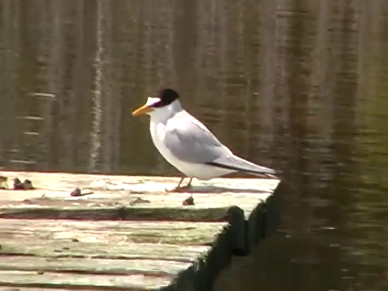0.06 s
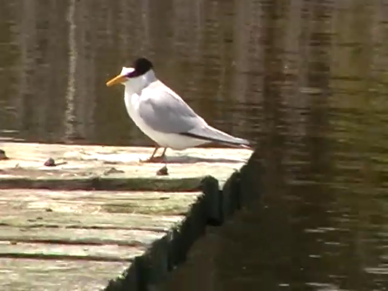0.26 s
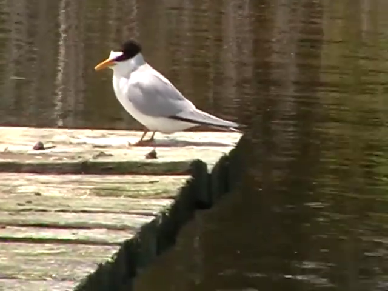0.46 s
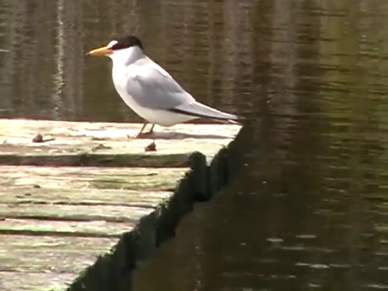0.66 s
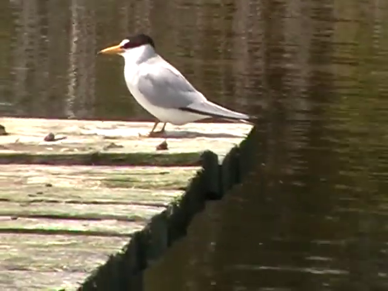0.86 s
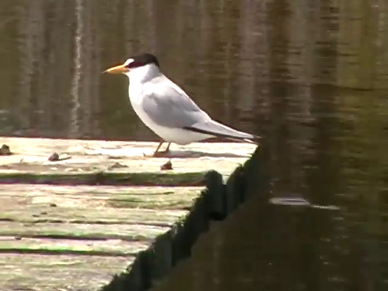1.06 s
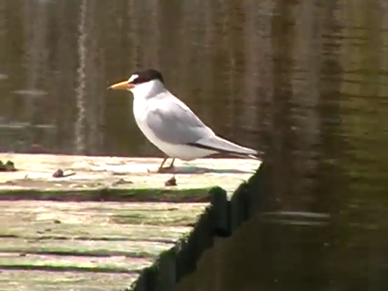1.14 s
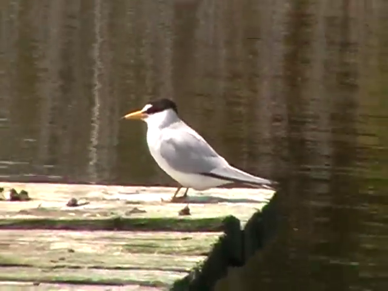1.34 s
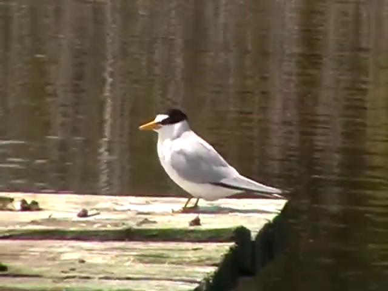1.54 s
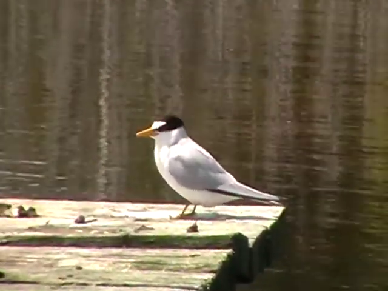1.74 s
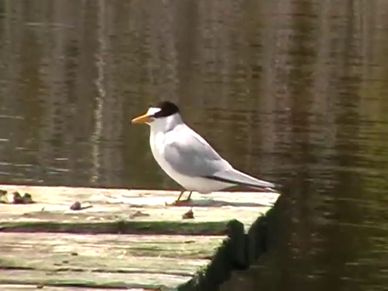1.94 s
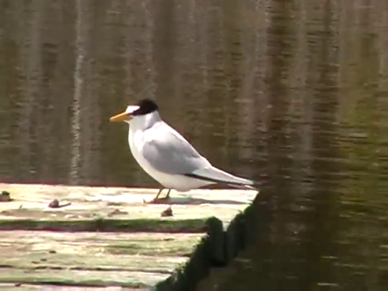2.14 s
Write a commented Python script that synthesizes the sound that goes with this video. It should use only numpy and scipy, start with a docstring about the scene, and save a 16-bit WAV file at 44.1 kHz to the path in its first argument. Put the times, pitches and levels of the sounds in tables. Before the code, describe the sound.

One seabird calls outdoors beside calm water: high rising chirps with tiny clicks, a buzzy falling trill and slide, then spaced raspy chatter. Slight echo, faint wind bumps and far whistles; clear, centred pickup.

```python
"""A tern on a wooden dock opens with mostly rising chirps, broken by quick downward flicks.
A sinking trill follows, then one long downward slide with a second voice trailing it, then seven
harsh chatter notes; all are oscillators for the voice membranes, with filtered noise for turbulent air.
Delayed copies and decaying noise form the reflections of dock, water and bank. Throughout, other birds
whistle faintly over a wash of soft shaped noise, and band-passed noise makes the early wind bumps."""
import sys
import numpy as np
from scipy import signal
from scipy.fft import rfft, irfft, next_fast_len
from scipy.io import wavfile
from scipy.ndimage import uniform_filter1d

SR = 44100
rng = np.random.default_rng(int(sys.argv[2]) if len(sys.argv) > 2 else 0)


def store_wav(level_fs):
    """Save 16-bit WAV to argv[1]."""
    pcm = np.round(np.clip(np.atleast_2d(level_fs), -1, 1) * 32767)
    wavfile.write(sys.argv[1], SR, pcm.T.astype(np.int16))


N = 97020

# Spectrum of the turbulent air in flicks and trill: f/Hz, level/dB
AIR_SPECTRUM = [(1500, -26), (2600, 14), (4500, 5), (5800, -2), (7500, 6), (9300, -2), (11000, -14),
                (16000, -1)]


def amp(db):
    """Decibel law: 20 dB is a factor of ten in pressure."""
    return 10 ** (np.asarray(db) / 20)


def unit(x):
    """Normalisation of mean power: scales to rms 1."""
    return x / np.sqrt(np.mean(x ** 2) + 1e-20)


def read(points, hz):
    """Logarithmic pitch scale: interpolates a spectrum on a log-frequency axis."""
    f, v = np.transpose(points)
    return np.interp(np.log(hz + 1), np.log(f + 1), v)


def colour(x, points):
    """Linear filtering: multiplies the spectrum of x by a response in dB."""
    size = next_fast_len(2 * len(x))
    gain = amp(read(points, np.fft.rfftfreq(size, 1 / SR)))
    return irfft(rfft(x, size) * gain, size)[:len(x)]


def wobble(count, hz):
    """Band-limited randomness: noise with a Gaussian roll-off of scale hz, rms about 1."""
    f = np.fft.rfftfreq(16384, 1 / SR)
    white = rfft(rng.standard_normal(2 * len(f) - 2))
    return unit(irfft(white * np.exp(-(f / hz) ** 2)))[:count]


def hiss(count, points):
    """Turbulence: broadband noise with a given spectrum, rms 1."""
    return unit(colour(wobble(count, SR), points))


def add(mix, s, sound):
    """Superposition: adds a sound to the mix from time s."""
    part = mix[max(round(s * SR), 0):][:len(sound)]
    part += sound[:len(part)]


def gate(t, length, edge):
    """Smooth onset and release: sine-squared edges avoid clicks."""
    return np.sin(np.pi / 2 * np.clip(np.minimum(t, length - t) / edge, 0, 1)) ** 2


def syrinx(hz, rough, partials_db):
    """Harmonic oscillation of one membrane; roughness modulates its frequency and amplitude."""
    jitter, shimmer = 0.077, 0.48  # rms modulation of pitch and strength at roughness 1
    rate_hz = 710
    shaken_hz = hz * (1 + jitter * rough * wobble(len(hz), rate_hz))
    phase = 2 * np.pi * np.cumsum(shaken_hz) / SR
    tone = 0
    for k, db in enumerate(partials_db, 1):
        tone = tone + amp(db) * np.sin(k * phase) * (k * hz < SR / 2)  # mute above Nyquist
    shake = shimmer * rough
    power_match = np.sqrt(2 / (1 + shake ** 2))  # a 0 dB partial has rms near 1
    return power_match * tone * (1 + shake * wobble(len(hz), rate_hz))


def chirp(start, length, first_hz, last_hz, db, swell_db, rough, overtone_db):
    """Frequency glide: the whistle scoops up, moves between two pitches and drops as it shuts."""
    scoop, scoop_s = 0.066, 0.0039  # fraction of pitch, time constant/s
    drop, drop_s = 0.097, 0.002
    waver, ripple, waver_hz = 0.035, 0.81, 158  # pitch and log-strength flutter at roughness 1
    t = np.arange(0, length, 1 / SR)
    u = t / length
    bend = 1 - scoop * np.exp(-t / scoop_s) - drop * np.exp((t - length) / drop_s)
    hz = (first_hz + (last_hz - first_hz) * u) * bend
    hz = hz * (1 + waver * rough * wobble(len(t), waver_hz))
    flutter = np.exp(ripple * rough * wobble(len(t), waver_hz))
    level = amp(db + swell_db * (u - .5)) * flutter * gate(t, length, 0.0035)
    return start, level * syrinx(hz, rough, [0, overtone_db, overtone_db - 4])


def flick(start, db):
    """Register break: the pitch plunges exponentially in milliseconds, amid turbulent air."""
    length, top_hz, end_hz, rough = .008, 7060, 2358, 1.1
    t = np.arange(0, length, 1 / SR)
    hz = top_hz * (end_hz / top_hz) ** (t / length)
    voice = amp(-3) * syrinx(hz, rough, [0, -12])
    air = amp(-5) * hiss(len(t), AIR_SPECTRUM)
    return start, amp(db) * gate(t, length, length / 4) * (voice + air)


def trill():
    """Periodic frequency modulation: each beat leaps up and falls back to a mostly sinking note."""
    # Contour of the trill: t/s, lower pitch f/Hz, level/dB before the beat envelope
    contour = [(0.719, 3150, -45), (.747, 3020, -25), (.78, 2932, -26), (0.824, 2764, -26.5),
               (0.861, 2760, -30), (.89, 2787, -31), (0.911, 2720, -40)]
    # Strength of each harmonic, lowest first: level/dB
    partials = [-1, -28, -21.5, -44, -36]
    rate, end_rate = 67, 100  # beats per second
    leap, fall = 0.47, 0.21  # fraction of pitch, fraction of a beat
    s, low_hz, db = np.transpose(contour)
    t = np.arange(s[0], s[-1], 1 / SR)
    beat = np.cumsum(np.linspace(rate, end_rate, len(t))) / SR % 1
    hz = np.interp(t, s, low_hz) * (1 + leap * np.exp(-(beat / fall) ** 2))
    pulse = 0.41 + 0.67 * gate(beat, 0.91, 0.16)
    level = amp(np.interp(t, s, db)) * pulse * gate(t - s[0], s[-1] - s[0], 0.0035)
    air = amp(-15) * hiss(len(t), AIR_SPECTRUM)
    return s[0], level * (syrinx(hz, 0.24, partials) + air)


def slide():
    """Glissando with changing harmonic content: the overtones grow as the whistle sinks."""
    # Contour of the slide: t/s, pitch f/Hz, level/dB before partial balance
    contour = [(0.924, 4110, -32), (0.933, 3790, -30.5), (0.944, 3393, -20), (.958, 2815, -21),
               (0.974, 2252, -28), (0.986, 2237, -26.5), (1.0, 1810, -36.5), (1.016, 1540, -40.5)]
    overtones_db = [-19.5, -31, -32.5, -38]  # at mid-slide
    brighten_db = 42  # total overtone growth
    s, hz, db = np.transpose(contour)
    t = np.arange(s[0], s[-1], 1 / SR)
    bright = brighten_db * np.linspace(-.5, .5, len(t))
    partials = [-3] + [p + bright for p in overtones_db]
    level = amp(np.interp(t, s, db)) * gate(t - s[0], s[-1] - s[0], 0.0035)
    return s[0], level * syrinx(np.interp(t, s, hz), 0.066, partials)


def aftertone():
    """Two-voiced syrinx: a second falling whistle trails the slide."""
    # Second voice: start t/s, length t/s, first f/Hz, middle f/Hz, last f/Hz, level/dB
    trailing_voice = (1.004, .036, 2450, 2320, 2080, -35)
    return whistle(*trailing_voice)


def chatter(start, arch_s, top_hz, arch_db, rasp_db, length, rough, throat_db):
    """Amplitude modulation by a second, falling voice: a clear arch of pitch tears into a rasp."""
    # Harmonics of the voice, lowest first: level/dB
    voice_partials = [-1, -24]
    # Spectrum of the rasp's noise: f/Hz, level/dB
    rasp_spectrum = [(500, -53), (1400, -10.5), (2400, -20.5), (3200, -1), (4000, 4), (4600, -5.5),
                     (5400, -1), (6800, -16), (9000, -12), (12000, -25.5), (16000, -25)]
    arch_depth = .33  # fraction of pitch
    second_hz, second_fall_s, second_depth = 4300, .026, .55
    streak_hz, streak_fall_s = 8540, .036
    peak, fade_db = 0.43, -16  # onset ends at this fraction of the note; fade from there to the end
    rasp_rate, swing = 130, 0.351  # mean beats per second, fraction of pitch
    t = np.arange(0, length, 1 / SR)
    u = t / length
    hz = top_hz * (1 - arch_depth * abs(2 * np.minimum(t / arch_s, 1) - 1) ** 2.53)
    arch = amp(arch_db) * gate(t, arch_s, 0.0035 / 2) * syrinx(hz, rough, voice_partials)
    second = syrinx(second_hz * np.exp(-t / second_fall_s), .25, [0])
    streak = syrinx(streak_hz * np.exp(-t / streak_fall_s), .15, [0])
    beat = np.cumsum(rasp_rate * (1 + 0.21 * wobble(len(t), 100))) / SR % 1
    voice = syrinx(top_hz * (1 + swing * (.4 - beat)), 0.67, voice_partials)
    air = unit(hiss(len(t), rasp_spectrum) * (1.9 - beat))  # strongest as each beat begins
    rasp = amp(-2.5) * voice * (1 + second_depth * second)
    rasp += amp(2.5) * air + amp(-12) * second + amp(-12.5) * streak
    throat = [(4200, 0), (5400, throat_db), (6800, 0)]  # resonance: f/Hz, gain/dB
    rasp = unit(colour(rasp, throat))
    onset = np.minimum(u / peak, 1) ** 2
    fade = amp(rasp_db + fade_db * np.maximum(u - peak, 0) / (1 - peak))
    level = fade * onset * gate(t, length, 0.0035)
    return start, arch * (1 + second_depth * onset * second) + level * rasp


def whistle(start, length, first_hz, middle_hz, last_hz, db):
    """Quadratic frequency glide: a faint curved whistle through three pitches."""
    t = np.arange(0, length, 1 / SR)
    curve = np.polyfit([0, .5, 1], [first_hz, middle_hz, last_hz], 2)
    hz = np.polyval(curve, t / length)
    return start, amp(db) * gate(t, length, length / 4) * syrinx(hz, .2, [0, -20])


def shore(x):
    """Convolution with an impulse response: discrete reflections, dock scatter and diffuse bank echo."""
    # Reflections: delay t/s, level/dB
    reflections = [(0.0072, -15.5), (0.0015, -26.5), (0.0092, -13)]
    # Spectrum of the echo from the wooded bank: f/Hz, level/dB
    bank_spectrum = [(4500, 2.5), (7000, -10), (12000, 14)]
    bank_t60, bank_build_s, boards_t60 = 0.42, 0.0033, 0.13  # 60 dB decay times and build-up/s
    t = np.arange(SR) / SR
    bank = rng.standard_normal(SR) * amp(-60 * t / bank_t60) * (1 - np.exp(-t / bank_build_s))
    bank = amp(-16) * unit(bank) / np.sqrt(SR)
    boards = rng.standard_normal(SR) * amp(-60 * t / boards_t60)
    boards = amp(-12.5) * unit(boards) / np.sqrt(SR)
    response = colour(bank, bank_spectrum) + boards
    response[0] += 1  # direct sound
    for delay, db in reflections:
        add(response, delay, amp([db]))
    return signal.fftconvolve(x, response)[:N]


def bump(middle, half_length, hz, db):
    """Wind pressure fluctuation: a short low-frequency buffet of band-passed noise."""
    t = np.arange(0, 2 * half_length, 1 / SR)
    band = signal.butter(2, [hz / 2, hz * 1.44], "bandpass", fs=SR, output="sos")
    noise = signal.sosfilt(band, rng.standard_normal(SR // 2))[-len(t):]
    puff = noise * gate(t, 2 * half_length, half_length) ** 2
    return middle - half_length, amp(db - 2.5) * unit(puff)


def wash():
    """Random-phase spectral synthesis: distant air and water as soft noise with drifting patches."""
    # Spectrum of the wash: f/Hz, relative level/dB
    wash_spectrum = [(15, -52), (25, -11), (45, -25.5), (85, -1), (140, -2.5), (250, -3), (400, -4),
                     (530, -2), (640, 2.5), (850, -2.5), (1080, 1.5), (1500, -4), (2000, -7.5),
                     (2500, -8.5), (3000, -11.5), (4000, -15.5), (5000, -21.5), (6500, -24.5),
                     (8500, -31.5), (10200, -40), (12000, -42), (15700, -55)]
    frames, hz = N // 256 + 5, np.fft.rfftfreq(1024, 1 / SR)
    a, b, patches = rng.standard_normal((3, frames, len(hz)))
    patches = uniform_filter1d(patches, size=12, axis=0)  # smooth in time
    patches = unit(uniform_filter1d(patches, size=10, axis=1))  # and in frequency
    z = (a + 1j * b) * amp(read(wash_spectrum, hz) + 1.5 * patches)  # 1.5 dB rms patchiness
    noise = signal.istft(z.T, nperseg=1024, noverlap=768)[1][:N]
    return amp(-39.5) * unit(noise)


def scene():
    """Superposition of sources: reflected calls, wind and wash, alike in both channels."""
    # Clear chirps: start t/s, length t/s, first f/Hz, last f/Hz, mid-note level/dB,
    # swell over the note/dB, roughness [0-1], overtone level/dB
    chirp_notes = [(.021, 0.03, 3820, 5000, -43.5, -6, 0.52, -15),
                   (.103, 0.054, 4090, 4710, -40.5, -9, 0.22, -12),
                   (.195, 0.054, 4030, 4650, -36.5, -10.5, 0.32, -14.5),
                   (0.3, .049, 4190, 4650, -34, 3, 0.29, -10),
                   (0.406, .043, 4585, 4878, -25.5, 11.5, 0.19, -19),
                   (0.517, 0.03, 4976, 5080, -17, 11, 0.03, -31.5),
                   (0.557, 0.013, 4750, 4750, -27.5, -7, 0.15, -23),
                   (0.576, 0.021, 4550, 4330, -34.5, -5, 0.73, -20.5),
                   (0.674, 0.0234, 4930, 5130, -20.5, 5, 0, -25),
                   (0.701, .013, 4900, 4835, -19, 5, 0.14, -24.5),
                   (0.718, 0.014, 4610, 4840, -25, 8, .1, -18),
                   (0.733, 0.016, 4580, 4550, -32.5, 6, 0.74, -7.5)]
    # Breaks of the voice: start t/s, level/dB before the mix of tone and air
    voice_breaks = [(0.089, -38.5), (.111, -40), (0.146, -41), (.218, -32), (0.244, -37), (0.256, -35.5),
                    (.349, -35), (0.453, -33), (0.551, -32), (0.567, -34.5), (0.583, -34), (0.598, -30.5),
                    (0.624, -39.5), (.695, -27), (.714, -30), (.730, -32)]
    # Chatter notes: start t/s, arch length t/s, top pitch f/Hz, arch level/dB, rasp level/dB
    # before its envelope, whole length t/s, arch roughness [0-2], throat resonance gain/dB
    chatter_notes = [(1.031, .017, 3990, -22, -22.5, 0.053, 0.22, 7),
                     (1.131, .019, 4117, -24, -23.5, 0.053, 0.22, 0.5),
                     (1.244, 0.02105, 4015, -26, -22, 0.055, 0.1, -3.5),
                     (1.373, .022, 4140, -23.5, -21, 0.061, 0.29, -1.5),
                     (1.51, .021, 4054, -23.5, -20.5, 0.056, 0.067, -2),
                     (1.673, 0.023, 3962, -26, -22.5, 0.054, 1.04, -2),
                     (1.871, 0.026, 3950, -30.5, -28, 0.058, 1.1, -2.5)]
    # Far birds: start t/s, length t/s, first f/Hz, middle f/Hz, last f/Hz, level/dB
    far_calls = [(0.617, 0.11, 2980, 2745, 2590, -42.5), (1.33, .03, 7700, 6570, 5500, -56),
                 (1.415, 0.085, 3100, 3020, 3860, -51), (1.717, .09, 3150, 2950, 3440, -49.5),
                 (2.038, 0.092, 2700, 3114, 2840, -45)]
    # Wind bumps: middle t/s, half-length t/s, pitch f/Hz, level/dB before a 2.5 dB cut
    wind_bumps = [(.08, 0.045, 66.3, -44), (.19, 0.028, 158, -41), (0.831, .05, 131, -40),
                  (.89, 0.088, 91.5, -45), (0.969, 0.022, 190, -38.5), (1.517, 0.035, 178, -40)]
    # Treble response of the microphone, applied to the calls: f/Hz, gain/dB
    mic_response = [(20, -1.5), (8500, 0), (9700, -2), (10600, -9.5), (11800, -24.5), (13500, -23.5),
                    (16000, -16)]
    birds, wind = np.zeros(N), np.zeros(N)
    sources = (chirp, chirp_notes), (flick, voice_breaks), (chatter, chatter_notes), (whistle, far_calls)
    for source, table in sources:
        for row in table:
            add(birds, *source(*row))
    for phrase in trill, slide, aftertone:
        add(birds, *phrase())
    for row in wind_bumps:
        add(wind, *bump(*row))
    calls = colour(shore(birds), mic_response)
    return np.tile(calls + wind + wash(), (2, 1))


def record(dry):
    """Band limitation: a linear-phase low-pass filter at 15750 Hz."""
    lowpass = signal.firwin(511, 15750, window=("kaiser", 9), fs=SR)
    return signal.oaconvolve(dry, lowpass[None], "same")


dry = scene()
out = record(dry)
store_wav(out)
```